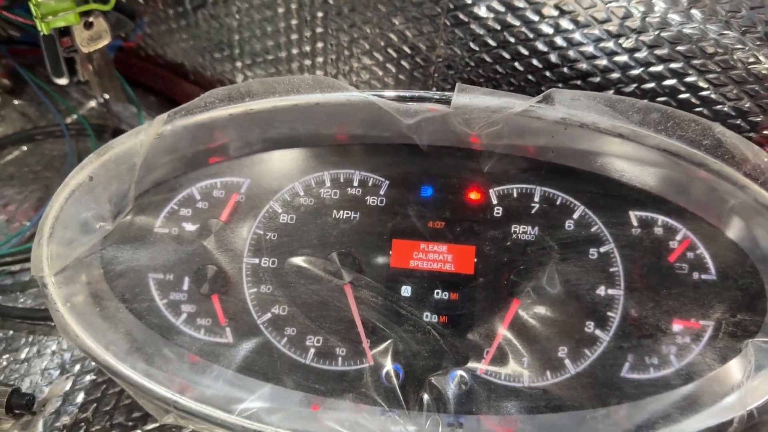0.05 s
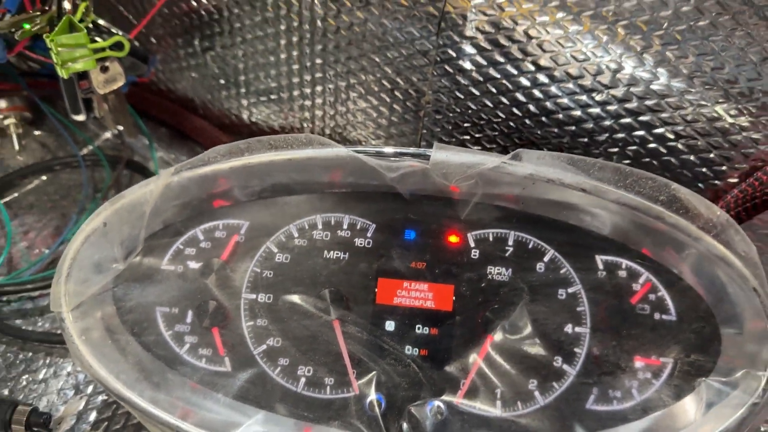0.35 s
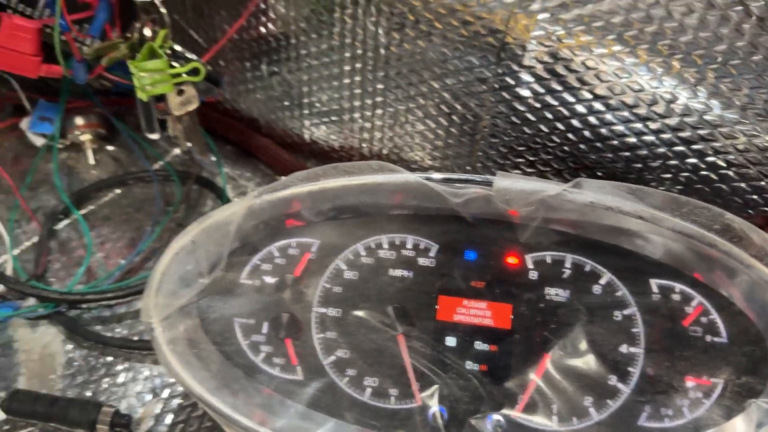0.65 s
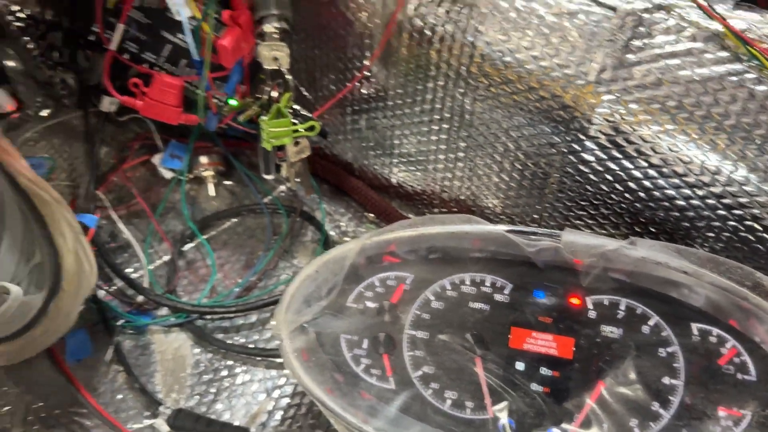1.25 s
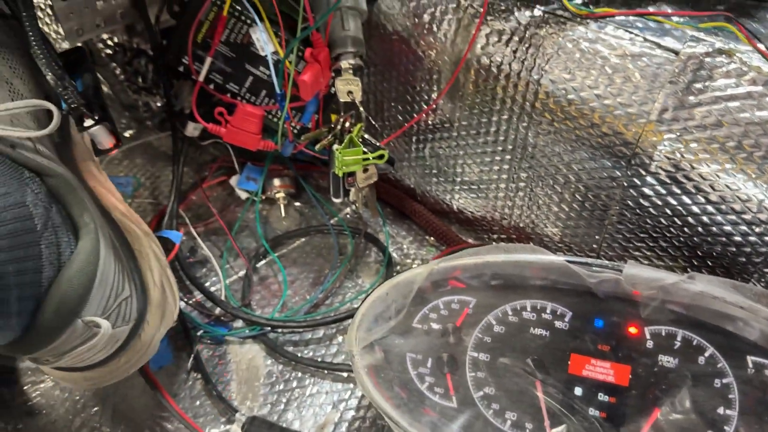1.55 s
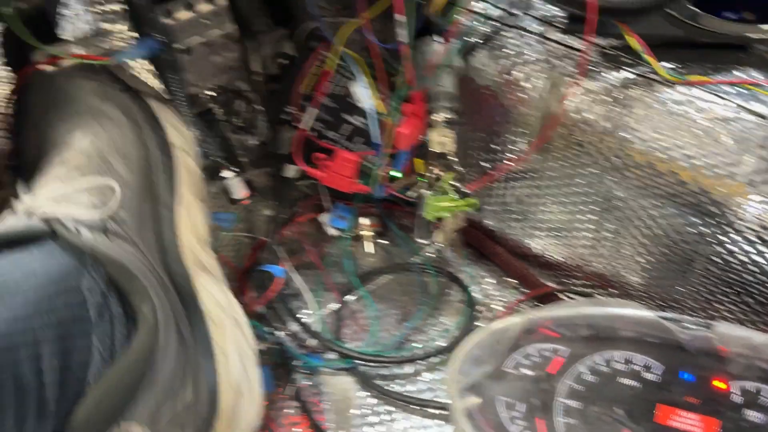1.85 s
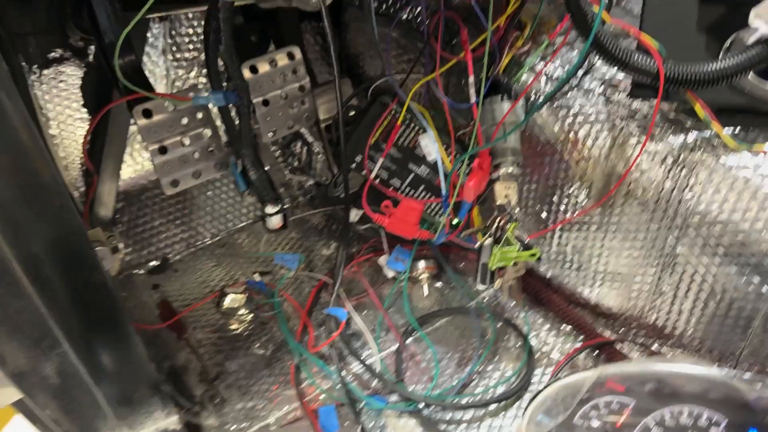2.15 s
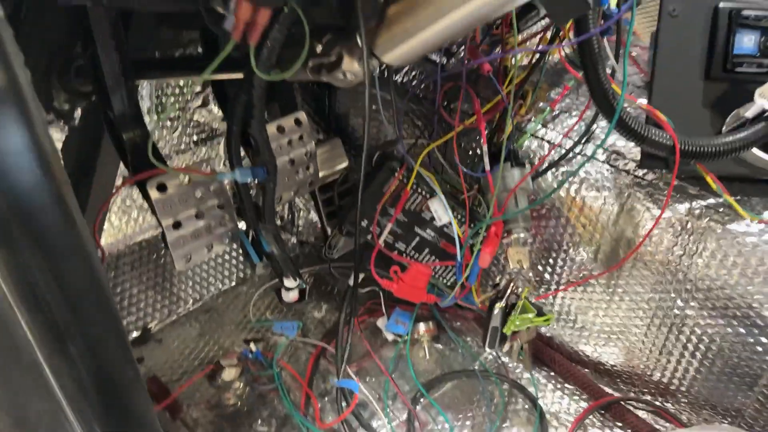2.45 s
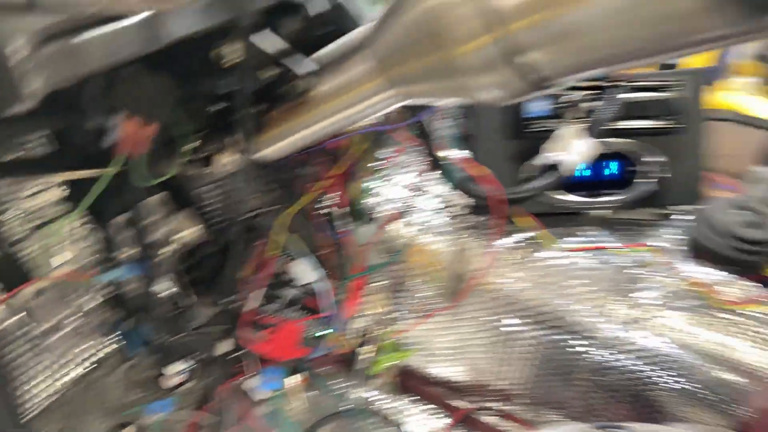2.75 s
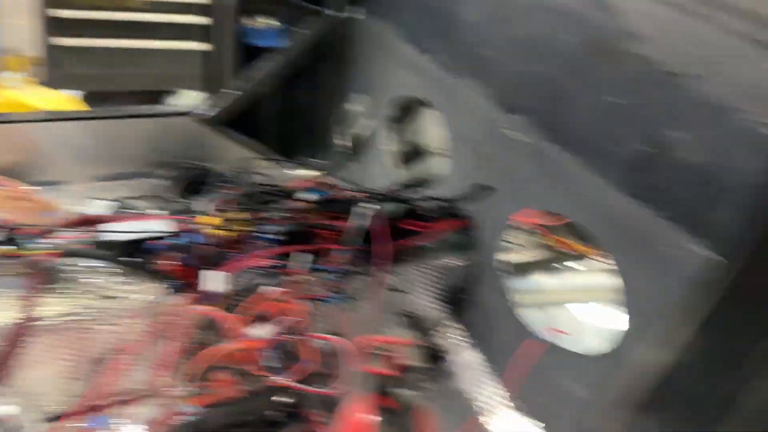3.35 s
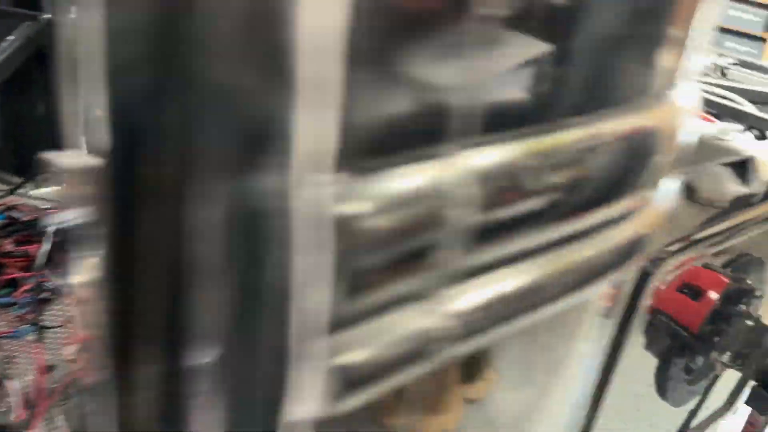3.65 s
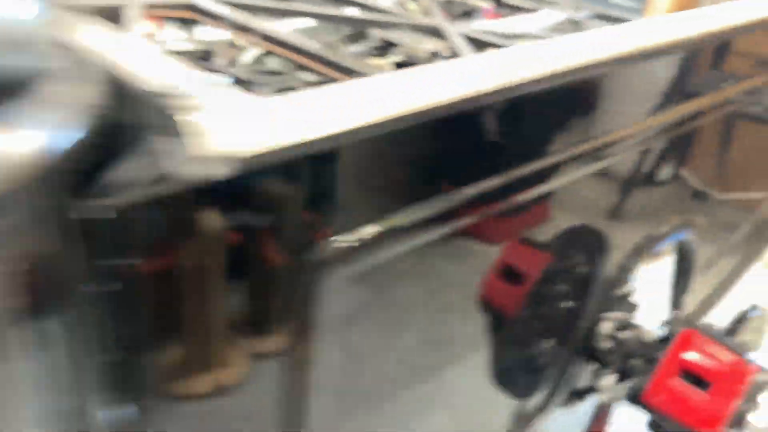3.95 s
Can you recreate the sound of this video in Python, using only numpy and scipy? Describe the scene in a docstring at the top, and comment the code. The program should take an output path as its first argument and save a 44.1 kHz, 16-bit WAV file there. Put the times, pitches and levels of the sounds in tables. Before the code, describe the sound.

A car engine idles fast with a deep, uneven chug, heard from the footwell of an unfinished cabin. It sags briefly after a faint clink, a metal pedal taps, and the growl grows as the microphone reaches the door.

```python
"""An eight-cylinder engine idles fast, heard in the bare cabin of a car under construction.
Its firings leave through two pipes as a boom, a growl and a chug; it lopes once a cycle and sags once.
Loose metal clinks, and a shoe slips off a metal pedal, which taps and rings. Then the microphone swings
from the footwell out to the door, where the exhaust growls more. Panels hum along with the engine,
and gas rumble, mechanical rustle and a soft hiss of air run underneath."""
import sys
import numpy as np
from scipy import signal
from scipy.fft import rfft, irfft
from scipy.io import wavfile
from scipy.ndimage import uniform_filter1d, map_coordinates

SR = 44100
rng = np.random.default_rng(int(sys.argv[2]) if len(sys.argv) > 2 else 0)


def to_wav(sig):
    """Store sig (one row per channel, or 1-D mono) as 16-bit WAV at the path in sys.argv[1].

    Samples outside -1..1 are clipped; the rate is SR.
    """
    pcm = np.clip(np.atleast_2d(sig), -1, 1) * 32767
    pcm = np.round(pcm).astype(np.int16)
    wavfile.write(sys.argv[1], SR, pcm.T)  # frames by channels


N = 176400
T = np.arange(N) / SR

# engine speed in cycles a second; each cylinder fires once a cycle (t/s, f/Hz)
CYCLE_RATE = [(0.0, 11.003), (0.4, 11.061), (0.6, 11.064), (0.98, 11.036), (1.16, 10.292), (1.4, 10.763),
              (1.95, 10.956), (2.3, 10.977), (2.5, 11.057), (3.1, 11.113), (3.7, 11.206), (4.0, 11.237)]
# the pipe that each of the eight firings leaves through (0 near, 1 far)
PIPE_OF_FIRING = np.array([0, 1, 1, 0, 1, 0, 0, 1])
# exhaust tones in the footwell and at the door (multiple of the cycle rate, relative level/dB)
FOOTWELL_TONES = [(5, -26), (7, -31), (8, -3), (9, -17.5), (10, -12.5), (11, 1), (12, -16.5), (13, -19),
                  (14, -31.5), (15, -21), (16, -22), (17, -34.5), (18, -12.5), (19, -13.5), (20, -8.5),
                  (21, -10), (22, -13.5), (23, -43.5), (24, -15.5), (25, -25.5), (26, -21), (27, -15),
                  (28, -38.5), (29, -27), (30, -16.5), (31, -21.5), (32, -20.5), (33, -30.5), (34, -38),
                  (35, -40), (36, -31), (37, -41), (38, -38.5), (39, -42.5), (40, -43), (41, -42),
                  (42, -43), (43, -40), (44, -42.5), (45, -32.5), (46, -42)]
DOOR_TONES = [(5, -23), (7, -26), (8, -5), (9, -7.5), (10, -16), (11, -5.5), (12, -37), (13, -26),
              (14, -36), (15, -22), (16, -12.5), (17, -21), (18, -10.5), (19, -37), (20, -8), (21, -19),
              (22, -11.5), (23, -42), (24, -11), (25, -16), (26, -36), (27, -7.5), (28, -20), (29, -5),
              (30, -22), (31, -26), (32, -15), (33, -25), (34, -24), (35, -30), (36, -22.5), (37, -18.5),
              (38, -37), (39, -37), (40, -37), (41, -44), (42, -43), (43, -34), (44, -22.5), (45, -39),
              (46, -32)]
# exhaust loudness before the trims in exhaust() (t/s, boom level/dB, growl level/dB, chug level/dB)
EXHAUST_LEVELS = [(0, -17, -23.5, -26), (.5, -17, -23, -29), (1.03, -16.5, -25, -28.5),
                  (1.15, -21, -26.5, -37), (1.27, -21.6, -26, -35.5), (1.42, -19.5, -25.5, -30.5),
                  (1.6, -18.5, -25.5, -31), (2.1, -18, -26, -29.5), (2.7, -17.5, -26.5, -32.5),
                  (3.1, -18, -24.5, -28), (3.5, -18, -24.7, -27.5), (3.75, -20.5, -24.8, -23.5),
                  (4, -24, -21, -21)]
# how tightly the upper tones bunch (t/s, 0 an even burble to 1 a sharp chug)
CHUG_SHARPNESS = [(0.9, 0.33), (1.4, 0.69), (3.3, 0.72), (3.9, 0.59)]
# hits of the pedal and of loose metal (t/s, relative level/dB, contact time/s)
PEDAL_HITS = [(2.0100, -28, 0.0058), (2.045, -39, 0.0093), (2.057, -43, .004)]
CLINK_HITS = [(.867, -44, .003), (.8705, -38.5, .004)]
# the notes they ring with (f/Hz, relative level/dB, time to fade by 60 dB/s)
PEDAL_RING = [(2471, -2, .04), (3526, 1.5, 0.051), (3830, -11, .03), (4200, -2, 0.056), (5071, -5, 0.048),
              (7181, -24, .03), (8899, -10.5, .03), (10650, -15, .03), (13600, -8, .028)]
CLINK_RING = [(3620, -6, .05), (4850, -5, .06), (5100, -6, .04), (7870, -4, 0.064), (8050, -2, .06),
              (10400, -10, .04)]
# humming panels (multiple of the cycle rate, relative level/dB, point of the cycle 0-1 where they swell)
DASHBOARD_TONES = [(37, -2.5, .88), (38, -6.5, .88), (39, -8.5, .88), (46, -6.5, .27), (48, -3.5, 0.42),
                   (55, -13, .15), (56, -1.5, .15), (57, -11.5, .15)]
SEAT_TONES = [(40, 6, .92), (44, 0, .92), (50, -8, .24), (53, 0, .24), (54, 3, .24), (55, -7, .24)]
# loudness of the dashboard hum (t/s, throb level/dB, steady tone level/dB)
DASHBOARD_LEVELS = [(0, -49.5, -49.5), (.9, -46, -47), (1.15, -51, -61), (1.5, -47.5, -66),
                    (1.95, -44, -53), (2.3, -39.5, -46.5), (2.55, -35.5, -41.5), (2.9, -40, -40),
                    (3.1, -43.5, -45.5), (3.4, -58, -60), (4, -44, -47.5)]
# how strong each noise is from low to high pitch (f/Hz, relative level/dB)
SCUFF_COLOUR = [(700, 10), (2000, -8), (4000, -10), (9000, -15.5), (15000, -23)]
RUMBLE_COLOUR = [(110, -20), (160, -4.5), (300, 0.5), (400, 0.5), (600, -10.5), (900, -19.5)]
RUSTLE_COLOUR = [(480, -2), (600, -4.5), (800, -5.5), (1100, -9.5), (1400, -11), (1900, -13), (2300, -18.5),
                 (3000, -32.5)]
HISS_COLOUR = [(1470, -42), (2500, -1), (5790, -8), (6950, -8), (8880, -11), (10300, -8.5), (13900, -12),
               (15500, -11.5)]
# loudness of the gas rumble before the lope (t/s, level/dB)
GAS_LEVEL = [(0, -48), (1.2, -41), (2.4, -47), (3.3, -35.5), (4, -34.5)]
# noise loudness before the trims in engine_noise() (t/s, rustle level/dB, hiss level/dB)
NOISE_LEVELS = [(0, -46.5, -57), (0.5, -47, -57.5), (1, -47, -56.5), (1.2, -48, -58.5), (1.75, -46.5, -57),
                (2.2, -45, -56), (2.6, -44.5, -54.5), (3.15, -43.5, -54), (3.6, -44, -53.5),
                (4, -44.5, -54.5)]

FIRINGS = len(PIPE_OF_FIRING)
BOOM_TOP_HZ, GROWL_TOP_HZ = 160, 280


def exhaust(cycle):
    """Firings make a low boom, a growl and a higher chug; no two firings are equally strong."""
    usual_hz, speed_hz = np.median(np.array(CYCLE_RATE)[:, 1]), curve(CYCLE_RATE)
    at_door = np.interp(T, (3.08, 4.16), [0, 1])  # the microphone moves from footwell to door
    scatter, out = per_firing(cycle), 0
    # boom, growl, chug (lowest f/Hz, highest f/Hz, trim/dB, roughness, timing, swell)
    bands = [(0, BOOM_TOP_HZ, 0.5, 0.058, pipe_phase, 1),
             (BOOM_TOP_HZ, GROWL_TOP_HZ, 0.5, 0.12, pipe_phase, lope(cycle)),
             (GROWL_TOP_HZ, SR, -0.5, 0.085, chug_phase, 1)]
    for column, (low, high, trim_db, roughness, timing, swell) in enumerate(bands, start=1):
        tones, power = 0, 0
        for (multiple, footwell_db), (_, door_db) in zip(FOOTWELL_TONES, DOOR_TONES):
            if low < multiple * usual_hz <= high:
                size = (1 - at_door) * gain(footwell_db) + at_door * gain(door_db)
                size *= cabin_resonance(multiple * speed_hz) / cabin_resonance(multiple * usual_hz)
                tones += size * np.sin(2 * np.pi * multiple * cycle + timing(multiple, usual_hz))
                power += size ** 2 / 2
        level = gain(curve(EXHAUST_LEVELS, column) + trim_db)
        out += tones / np.sqrt(power) * level * (1 + roughness * scatter) * swell
    return out


def pipe_phase(multiple, cycle_hz):
    """Timing of one tone: the firings take uneven turns through two pipes of different length."""
    far_lag_s, far_db, lag_s_per_octave = .0052, -1, .0295
    hz = multiple * cycle_hz
    arrival_s = np.arange(FIRINGS) / FIRINGS / cycle_hz + PIPE_OF_FIRING * far_lag_s
    both_pipes = np.sum(gain(PIPE_OF_FIRING * far_db) * np.exp(-2j * np.pi * hz * arrival_s))
    highs_trail = 2 * np.pi * lag_s_per_octave * hz * np.log2(hz / BOOM_TOP_HZ)
    return np.angle(both_pipes) - highs_trail


def chug_phase(multiple, cycle_hz):
    """The upper tones bunch up once a cycle, the higher ones later, so each chug sweeps up."""
    centre_hz, cycle_point, sweep_hz_per_s = 336.46, .6, 3377  # for a fully sharp chug
    above = multiple - centre_hz / cycle_hz
    bunched = -2 * np.pi * (cycle_point * above + cycle_hz ** 2 / sweep_hz_per_s * above ** 2 / 2)
    spread = pipe_phase(multiple, cycle_hz)
    shortest_turn = np.angle(np.exp(1j * (bunched - spread)))
    return spread + curve(CHUG_SHARPNESS) * shortest_turn


def lope(cycle, depth=0.27, cycle_point=0.69):
    """The uneven beat of the idle: one swell in each engine cycle."""
    return (1 + depth * np.cos(2 * np.pi * (cycle - cycle_point))) / np.sqrt(1 + depth)


def cabin_resonance(hz, centre_hz=204.6, half_width_hz=14):
    """The cabin's air favours one pitch, which stays put when the engine slows."""
    return 1 / np.hypot(1, (hz - centre_hz) / half_width_hz)


def metal_taps(hits, notes, crack_db):
    """Short scraping contacts, each leaving a small metal part ringing."""
    out, t = np.zeros(N), T[:SR // 4]
    for start_s, db, contact_s in hits:
        ring = 0
        for hz, note_db, fade_s in notes:
            fade = np.exp(-np.log(1000) * t / fade_s)
            ring += gain(note_db) * np.sin(2 * np.pi * (hz * t + rng.random())) * fade
        scrape = noise([(2400, 6), (4000, 0), (6500, -4), (15000, -7)])[:len(t)]
        crack = gain(crack_db) * scrape * np.exp(-t / contact_s)
        hit = (ring / 2 + crack) * gain(db)
        out += np.pad(hit, (int(start_s * SR), N))[:N]
    return out


def shoe_scuff(start_s=1.915, rise_s=0.0075, db=-40.5):
    """The sole slips on the pedal with a brief, soft rub."""
    age = np.maximum(T - start_s, 0) / rise_s
    return noise(SCUFF_COLOUR) * age * np.exp(1 - age) * gain(db)


def panel_hum(cycle, waver_db=.8):
    """Panels hum louder as the microphone passes: first under the dashboard, then by the seat."""
    dashboard = throb(DASHBOARD_TONES, cycle, waver_db) * gain(curve(DASHBOARD_LEVELS, 1))
    steady_db = curve(DASHBOARD_LEVELS, 2) + waver_db * drift(9.2)
    steady = np.sqrt(2) * np.sin(2 * np.pi * 64 * cycle) * gain(steady_db)
    near_seat = np.exp(-((T - 3.39) / 0.27) ** 2)  # closest at 3.39 s
    seat = throb(SEAT_TONES, cycle, waver_db) * gain(-40) * near_seat
    return dashboard + steady + seat


def throb(tones, cycle, waver_db):
    """Engine tones close in pitch beat together, swelling at their point of the cycle."""
    out = 0
    for multiple, db, cycle_point in tones:
        size = gain(db + waver_db * drift(9.14))
        out += size * np.cos(2 * np.pi * multiple * (cycle - cycle_point))
    return normalise(out)


def engine_noise(cycle):
    """Gas rumble swells once a cycle; mechanical rustle and air hiss pulse with every firing."""
    rustle_trim_db, hiss_trim_db, scatter_db = 3, 3.5, 5.5
    since_firing = cycle * FIRINGS % 1  # runs from 0 to 1 between firings
    puff = np.exp(-since_firing / 0.82) * gain(scatter_db * per_firing(cycle))
    puff -= puff.mean()
    rumble = noise(RUMBLE_COLOUR) * gain(curve(GAS_LEVEL)) * lope(cycle)
    rustle = noise(RUSTLE_COLOUR) * (1 + 0.28 * puff)
    rustle *= gain(curve(NOISE_LEVELS, 1) + rustle_trim_db + 0.48 * drift(18))
    hiss = noise(HISS_COLOUR) * (1 + 0.12 * puff)
    hiss *= gain(curve(NOISE_LEVELS, 2) + hiss_trim_db + 0.18 * drift(6.5))
    return rumble + rustle + hiss


def noise(colour):
    """Noise shaped by a colour table, falling away steeply past both ends."""
    hz, db = np.array(colour).T
    f = np.maximum(np.arange(N // 2 + 1) * SR / N, 1)
    shape = gain(np.interp(np.log(f), np.log(hz), db))
    edges = np.minimum(f / hz[0], 1) ** 4 * np.minimum(hz[-1] / f, 1) ** 4
    return normalise(irfft(rfft(rng.standard_normal(N)) * shape * edges, N))


def per_firing(cycle):
    """A fresh random value for every firing, joined smoothly."""
    return map_coordinates(rng.standard_normal(1024), [cycle * FIRINGS], mode="mirror")


def drift(rate_hz):
    """A slow random wobble, about 1 in size."""
    hold = int(SR / rate_hz)
    steps = np.repeat(rng.standard_normal(N // hold + 1), hold)
    return 1.3 * uniform_filter1d(uniform_filter1d(steps, hold), hold)[:N]


def curve(table, column=1):
    """One column of a table, joined by straight lines in time."""
    table = np.array(table)
    return np.interp(T, table[:, 0], table[:, column])


def gain(db):
    """Turn decibels into a number to multiply by."""
    return 10 ** (np.asarray(db) / 20)


def normalise(x):
    """Scale a sound to an average strength (rms) of 1."""
    return x / np.sqrt(np.mean(x ** 2))


def scene():
    """The idling engine with the small taps and the scuff on top."""
    cycle = .196 + np.cumsum(curve(CYCLE_RATE)) / SR  # counts engine cycles, starting partway into one
    pedal = metal_taps(PEDAL_HITS, PEDAL_RING, crack_db=-7.5)
    clink = metal_taps(CLINK_HITS, CLINK_RING, crack_db=-14)
    engine = exhaust(cycle) + panel_hum(cycle) + engine_noise(cycle)
    return (engine + pedal + clink + shoe_scuff())[None]


def record(dry, top_hz=15700):
    """The phone cuts the top of the treble."""
    return signal.sosfilt(signal.ellip(10, .2, 80, top_hz, fs=SR, output="sos"), dry)


dry = scene()
out = record(dry)
to_wav(out)
```